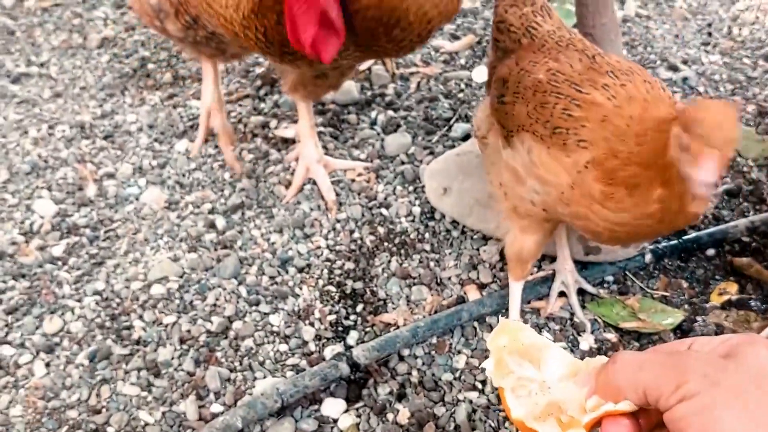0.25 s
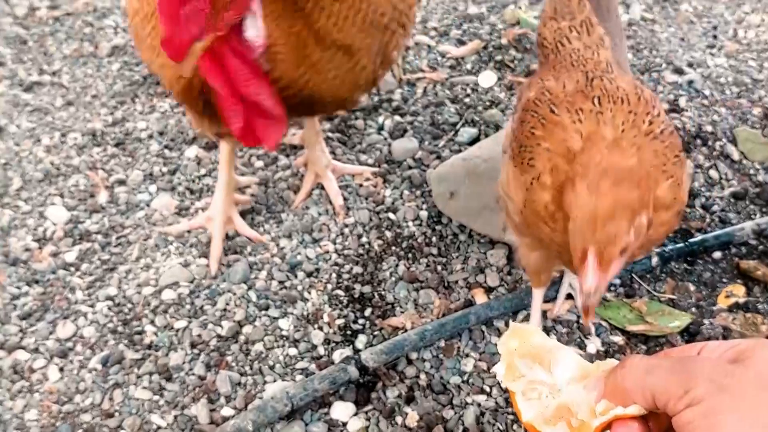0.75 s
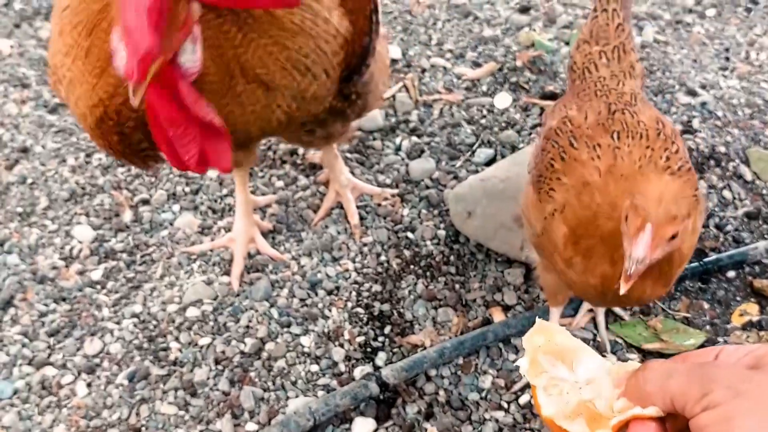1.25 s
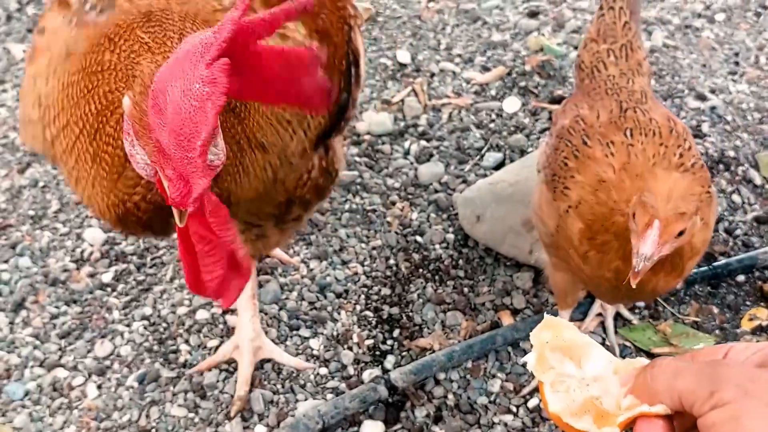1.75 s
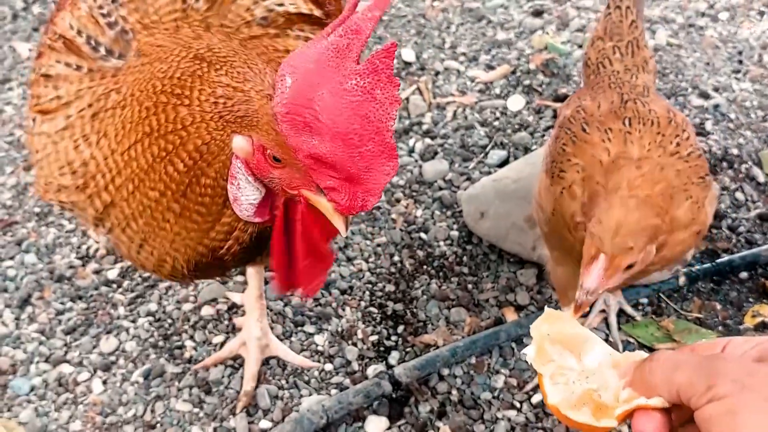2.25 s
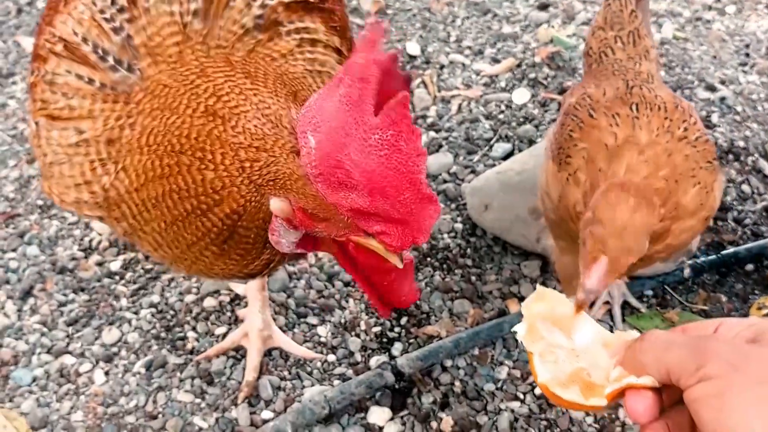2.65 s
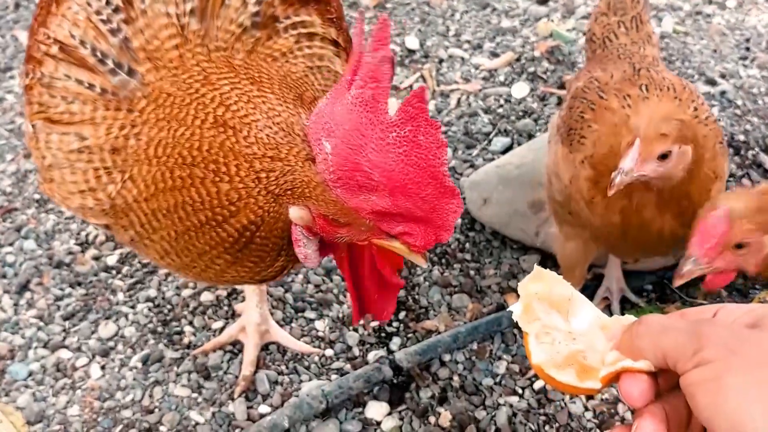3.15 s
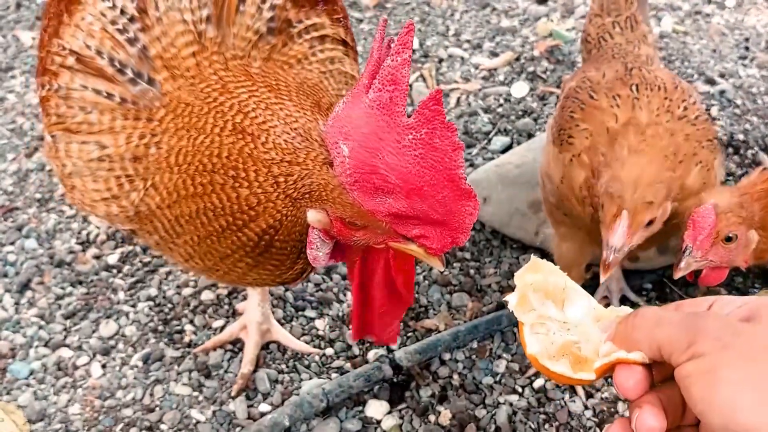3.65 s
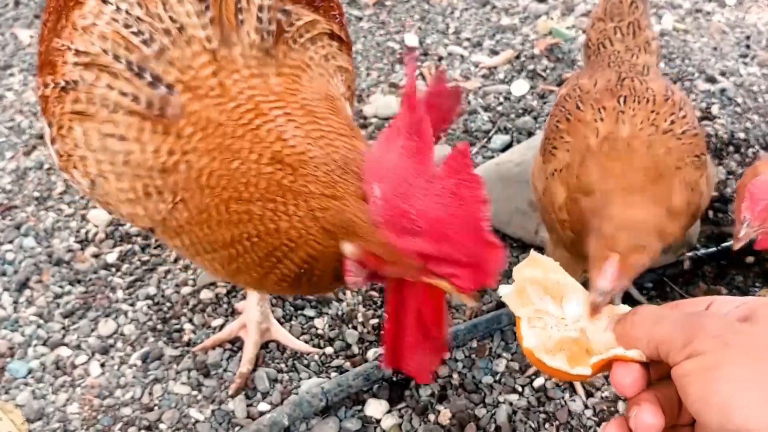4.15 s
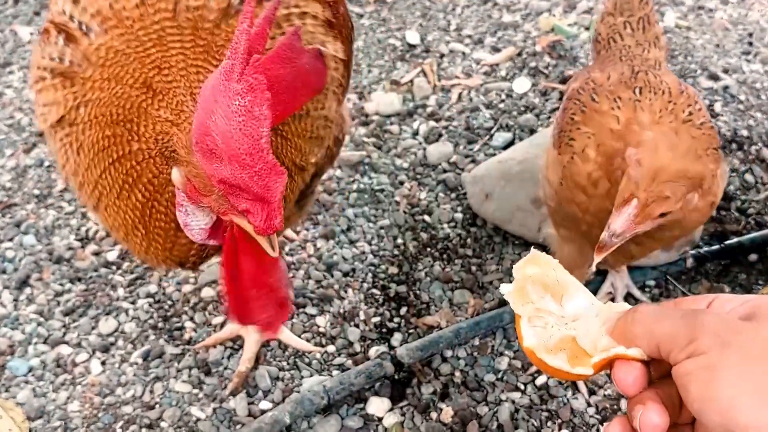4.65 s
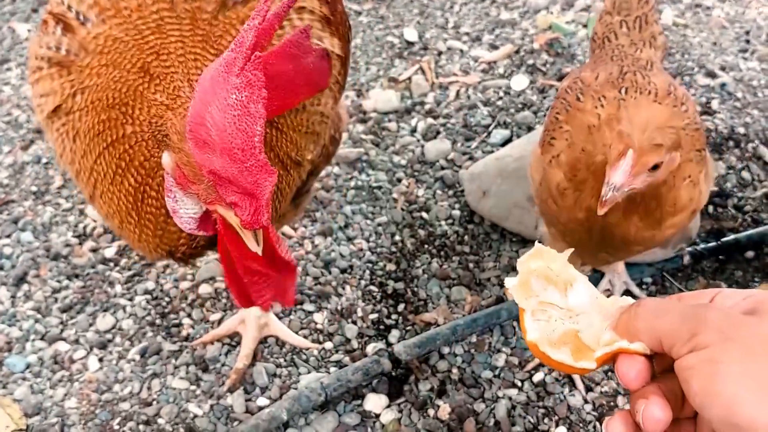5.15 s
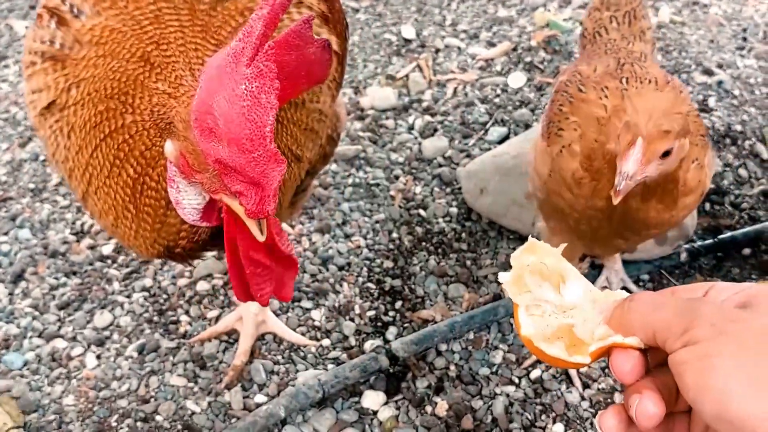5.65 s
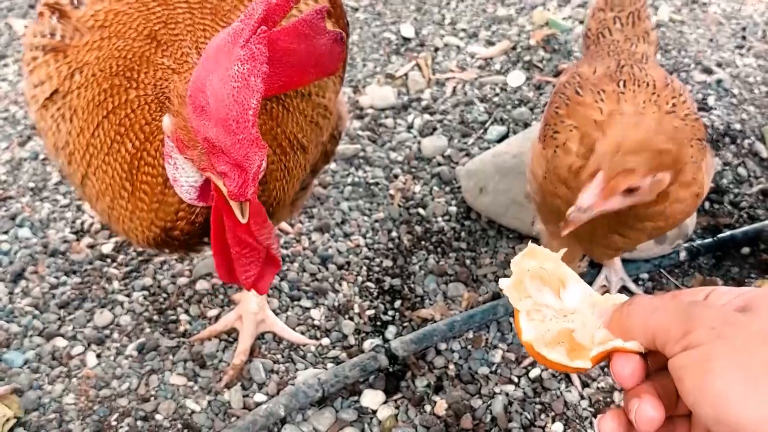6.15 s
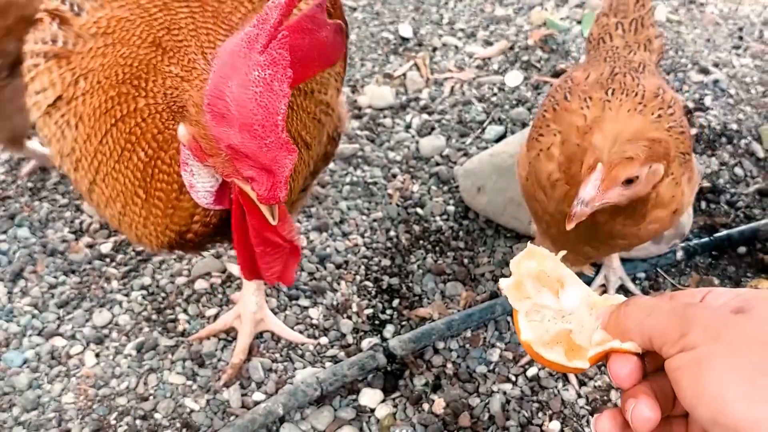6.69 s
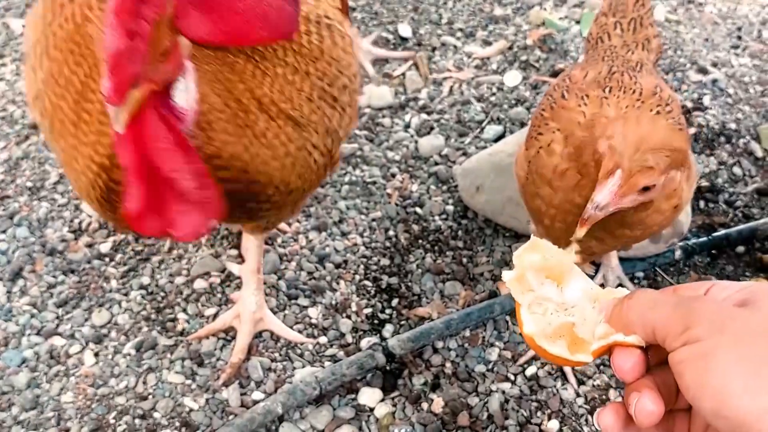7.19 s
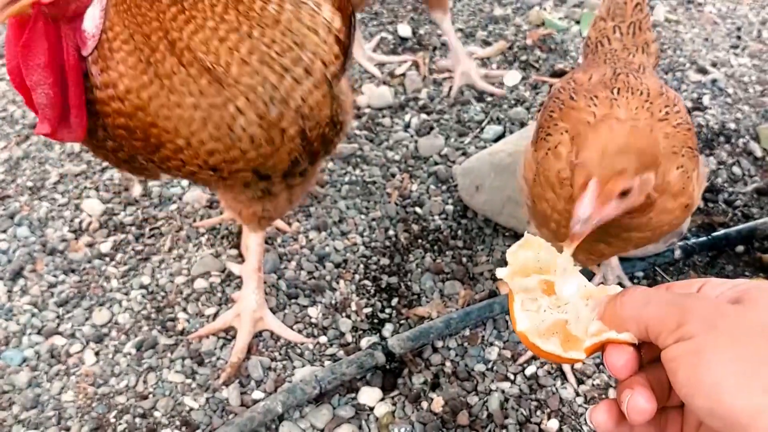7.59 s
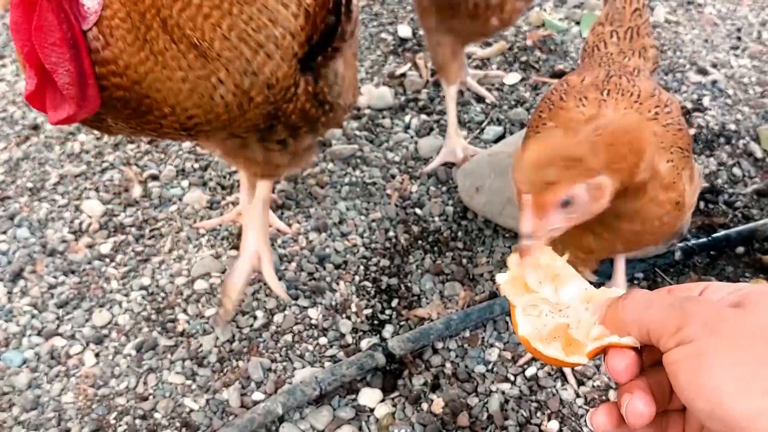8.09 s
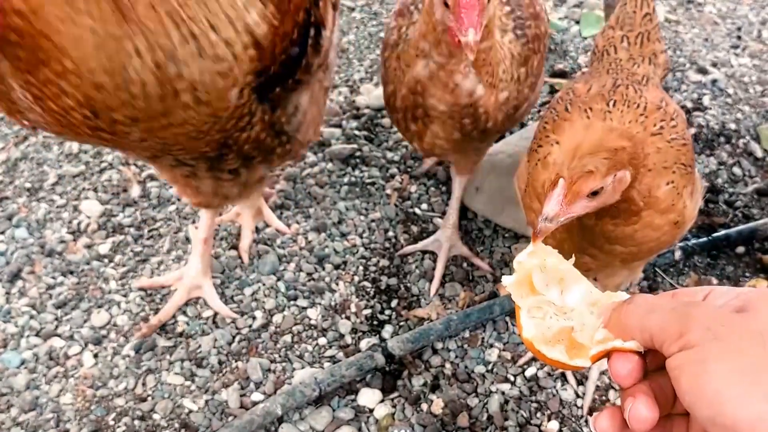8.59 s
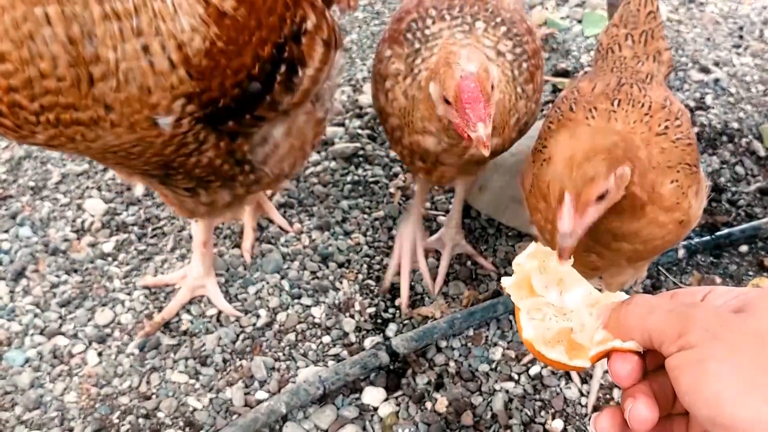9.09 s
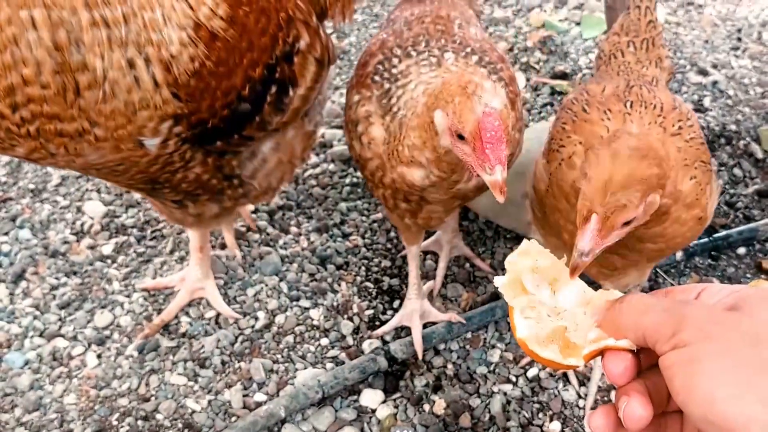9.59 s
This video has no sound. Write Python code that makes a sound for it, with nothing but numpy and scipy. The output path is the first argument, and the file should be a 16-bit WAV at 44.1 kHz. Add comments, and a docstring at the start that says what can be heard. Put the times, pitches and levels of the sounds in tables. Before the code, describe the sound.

A thin peep, a beak snap and a buzzing cheep open the scene, then short clucks quicken. Young chickens close to a stereo microphone give falling whistles that turn hoarse and break into yelps, while beaks snap and tear at fruit. Feathers and feet rustle softly on gravel, small birds chirp far away, and a low machine hum wavers beneath thin outdoor air.

```python
"""First a thin many-voiced peep, the snap of a beak and a buzzing cheep, over a low hum and thin air.
Young chickens then cluck and whistle around a hand that holds out fruit in a gravel yard. Each call is
built from gliding tones for the two sides of the syrinx, and turns hoarse or cracks into a yelp.
Beaks, feet and feathers are bursts of tiny snaps; small birds further off are blurred tones.
A distant machine drones on one wavering note, and scattered echoes surround all the birds and taps."""
import sys
import numpy as np
from scipy import signal
from scipy.fft import rfft, irfft
from scipy.io import wavfile

SR = 44100
rng = np.random.default_rng(int(sys.argv[2]) if len(sys.argv) > 2 else 0)


def master_out(mix):
    """Clip the mix to full scale and print it as 16-bit PCM to the path in sys.argv[1]."""
    frames = np.transpose(np.atleast_2d(mix))
    ceiling = np.clip(frames, -1, 1)
    pcm = np.round(ceiling * 32767).astype(np.int16)
    wavfile.write(sys.argv[1], SR, pcm)


N = 433503  # samples in the scene


def amp(db):
    """Decibels to gain."""
    return 10 ** (np.asarray(db) / 20)


def unit(x):
    """Scales to an rms of 1."""
    return x / np.sqrt(np.mean(abs(x) ** 2) + 1e-20)


def columns(rows, at):
    """Reads every further column of a table by straight lines along its first."""
    first, *rest = np.transpose(rows)
    return [np.interp(at, first, column) for column in rest]


def colour(x, points, tilt_db=0):
    """Filters by a few (Hz, dB) points, plus a tilt in dB per octave about 8 kHz, level below 1 kHz."""
    hz = np.fft.rfftfreq(x.shape[-1], 1 / SR) + 1  # keeps the logarithm finite
    point_hz, point_db = np.transpose(points)
    db = np.interp(np.log(hz), np.log(point_hz), point_db)
    db = db + tilt_db * np.log2(np.maximum(hz, 1000) / 8000)
    return irfft(rfft(x) * amp(db), x.shape[-1])


def wander(n, width_hz):
    """Complex noise of rms 1 that changes at about the width's pace or slower."""
    hz = np.fft.fftfreq(n, 1 / SR)
    spectrum = np.exp(2j * np.pi * rng.random(n)) / (1 + (hz / width_hz) ** 2)
    return unit(np.fft.ifft(spectrum))


def turn(hz):
    """A complex tone that follows a pitch curve."""
    return np.exp(2j * np.pi * np.cumsum(hz) / SR)


def grains(n, per_s, spread_db):
    """Tiny snaps of uneven size, each reaching the two microphones differently."""
    happens = rng.random(n) < per_s / SR
    size = happens * amp(spread_db * np.minimum(rng.exponential(1, n), 3))
    return unit(size * rng.uniform(-1.12, 1, (2, n)))


# Where the calling bird stands. Each row: time in seconds, lead of the left ear in ms.
BIRD_PLACE = [(1.55, -0.18), (2.5, 0.49), (4.9, 0.39), (6.55, 0.23), (7.2, 0.36), (7.9, 0.015),
              (8.85, 0.095), (9.08, 0.41)]


def add(mix, s, sound, lead_ms=0, side_db=0):
    """Places a sound between the two microphones by arrival time and level; positive is left."""
    for ear, sign, wave in zip(mix, (1, -1), np.broadcast_to(sound, (2, sound.shape[-1]))):
        start = max(0, round((s - sign * lead_ms / 2000) * SR))
        part = ear[start:][:len(wave)]
        part += amp(sign * side_db / 2) * wave[:len(part)]


# Moments when the voice cracks.
# Each row: middle in seconds, length in seconds, added hoarseness from 0 to 1.
CRACKS = [(2.51, 0.033, 0.24), (2.784, .035, 0.2), (5.753, 0.045, 0.52), (5.848, 0.043, 0.77),
          (6.87, 0.095, 0.57), (8.281, 0.065, 0.42), (8.388, 0.055, 0.55), (8.71, 0.037, 0.97),
          (8.779, 0.067, 0.79), (8.855, 0.015, 0.7), (5.894, .03, 0.17)]


def cracked(times):
    """How far the voice is cracked at each moment, as a sum of flat-topped bumps."""
    return sum(more * np.exp(-(2 * (times - s) / span) ** 4) for s, span, more in CRACKS)


# The falling whistles. Each row: start in seconds, length in seconds, first pitch in Hz, last pitch in Hz,
# arch of the glide in Hz, level in dB, swell from start to end in dB, belly in the middle in dB,
# overtones in dB, left-right balance in dB.
WHISTLES = [(2.443, 0.17, 2910, 2240, -38, -36, -1.5, 4, -24.5, 5),
            (2.704, 0.17, 2700, 2347, 401, -29, -7, -1.5, -34, 5.5),
            (3.046, 0.15, 2785, 2200, 263, -34, 4, 2.5, -29.5, -5.5),
            (4.027, 0.17, 2933, 2232, -160, -34, 4.5, 5.5, -32.5, 5),
            (4.741, .16, 2726, 2303, 101, -29, 5, 1.5, -27.5, 5.5),
            (5.402, 0.14, 2945, 2317, 34, -26.5, -2.5, -0.5, -28, 5),
            (5.691, 0.19, 2692, 2320, 197, -32, -8.5, 5.5, -30, 3.5),
            (6.504, 0.16, 2720, 2160, -34.5, -37, -3, 2, -34, 7),
            (6.805, 0.15, 2740, 2260, -47, -45, 9, 7.5, -50, 0),
            (7.13, 0.125, 3510, 2740, 220, -45.5, -6, 3.5, -27, 3),
            (7.887, 0.2, 2816, 2297, -48.5, -33.5, 10.5, 2, -31, -3.5),
            (8.235, 0.21, 2578, 2303, 210, -27, 10.5, -1.5, -22, 1.5),
            (8.665, 0.16, 2634, 2332, 214, -22, 10, -9, -18.5, -0.5)]
# Side bands of a hoarse voice. Each row: distance from the note in Hz, level in dB.
RASP_BANDS = [(-1200, -2.5), (-330, 0.5), (228.5, -5.5), (850, -7.5)]
# Colour of the throat. Each row: frequency in Hz, gain in dB.
THROAT = [(500, -9.5), (980, -3.5), (3400, -1), (5400, 8.5)]
ATTACK_S, RELEASE_S = 0.019, 0.002  # the release is for whistles that break into a yelp
FADE_S, FLICK_HZ = 0.024, 254  # the others fade out with an upward flick
ARCH_DELAY = 1.3  # above 1, the arch of the glide peaks late
CRACK_DB = 5.5  # a full crack is this much louder than the note around it
SECOND_VOICE_HZ = 725  # the other side of the syrinx sings this far above
SECOND_VOICE_DB = -47  # its level in a whistle of -34 dB
# The second voice opens each whistle alone, louder at first, sliding up to its note.
LEAD_S, LEAD_DB, LEAD_RISE_S = 0.02, 6, .012


def whistle(start, length, first_hz, last_hz, arch_hz, level_db, swell_db, belly_db, overtone_db,
            shimmer=0.087, second_share=0.44):
    """Two voices of the syrinx glide down in an arch; when hoarse, they scatter into side bands."""
    t = np.arange(0, length, 1 / SR)
    n, u = len(t), t / length
    breaks = any(abs(s - start - length) < .04 for s, *_ in YELPS)  # a yelp takes over at the end
    fade = np.minimum((length - t) / (RELEASE_S if breaks else FADE_S), 1)

    glide = first_hz + (last_hz - first_hz) * u + arch_hz * np.sin(np.pi * u ** ARCH_DELAY)
    flick = (not breaks) * FLICK_HZ * (1 - fade)
    hz = glide * (1 + .015 * wander(n, 30).real) + flick
    crack = cracked(start + t)
    db = level_db + swell_db * (u - .5) + belly_db * np.sin(np.pi * u) + CRACK_DB * crack
    hoarse = np.clip((.09 + crack) * (1 + .45 * wander(n, 45).real), 0, .9)
    main = turn(hz * (1 + (.005 + .03 * hoarse) * wander(n, 99).real))

    # the second voice leads in, then comes and goes, and grows less with effort
    apart_hz = SECOND_VOICE_HZ * (1 - np.exp(-t / LEAD_RISE_S))
    lead_db = LEAD_DB * np.exp(-(t / (2 * LEAD_S)) ** 2)
    second_db = SECOND_VOICE_DB + second_share * (level_db + 34.0) + lead_db - db  # relative to the main
    second_tone = turn(hz + apart_hz + 45 * wander(n, 90).real)
    second = amp(np.minimum(second_db, -3)) * second_tone * (.45 + .75 * wander(n, 16))

    rasp = unit(sum(amp(d) * turn(hz + off) * wander(n, 110) for off, d in RASP_BANDS))
    attack = np.clip((t - LEAD_S) / ATTACK_S + .5, 0, 1)
    voice = attack * (np.sqrt(1 - hoarse ** 2) * main + hoarse * rasp) + second
    # the voices share one airflow, so flickering sum tones appear above them
    both = voice - attack * hoarse * rasp / 2 + second
    sums = both ** 2 + .18 * both * (attack * main) ** 2
    voice = voice + amp(overtone_db) * (.3 + .75 * wander(n, 18)) * sums

    swell = amp(db) * (1 + shimmer * wander(n, 57).real) * np.minimum(t / LEAD_S, 1) * fade
    return colour(np.sqrt(2) * voice.real * swell, THROAT)


# Yelps, mostly where a whistle breaks down. Each row: start in seconds, length in seconds, level in dB.
YELPS = [(2.872, 0.02, -21), (4.901, 0.033, -17), (5.537, 0.02, -11), (5.866, 0.021, -13),
         (6.917, 0.015, -26), (7.213, 0.025, -49), (8.093, 0.031, -20), (8.44, 0.031, -15),
         (8.82, 0.019, -10)]
YELP_FIRST_HZ, YELP_LAST_HZ, YELP_OVERTONE_DB = 1858, 1410, -28
# The clucks. Each row: start in seconds, length in seconds, middle pitch in Hz, level in dB, overtones in dB.
CLUCKS = [(0.555, 0.026, 1087, -27, -9.5), (1.008, 0.034, 1032, -26.5, -23),
          (1.177, 0.023, 1052, -34.5, -30), (1.328, 0.044, 1124, -18.5, -28),
          (1.524, 0.047, 1102, -17, -18), (2.89, 0.019, 1020, -13, -3.5), (4.931, 0.018, 1030, -21.5, -7),
          (5.557, 0.016, 1053, -16, -4.5), (5.885, 0.03, 1082, -12, -9.5),
          (6.958, 0.022, 1146, -33.5, -8.5), (7.242, 0.029, 1175, -34.5, -5),
          (8.836, 0.027, 1025, -15.5, -2.5)]
CLUCK_FALL_OCT_PER_S = 8.2  # every cluck sags at this rate


def cluck(start, length, first_hz, last_hz, db, overtone_db, rolloff_db=-10, grit_db=-16):
    """A short falling note with overtones; bright ones start abruptly, and a crack doubles the period."""
    t = np.arange(0, length, 1 / SR)
    n, u = len(t), t / length
    harsh = np.clip(1 + overtone_db / 24, 0, 1)
    hz = first_hz + (last_hz - first_hz) * u ** .8
    half = turn(hz * (1 + .012 * wander(n, 150).real) / 2)  # an octave below the note
    tone = half ** 2
    step_db = rolloff_db * (1.91 - harsh)  # from one overtone to the next
    overtones = sum(amp(overtone_db + step_db * k) * 1j ** k * tone ** (k + 2) for k in range(6))
    undertone = cracked(start + t) * (half / 4 + half ** 3)
    grit = amp(grit_db) * harsh * (tone + tone ** 2 / 2 + tone ** 4 / 10) * wander(n, 400)
    shape = np.sin(np.pi * u ** (1.1 - .8 * harsh)).clip(0) ** .8
    shape = shape * (1 + .08 * wander(n, 84).real)
    voice = shape * (tone + overtones + undertone + grit).real
    return np.sqrt(2) * amp(db) * colour(voice, THROAT)


# Peeps of the youngest. Each row: start in seconds, length in seconds, first pitch of the steep voice in Hz,
# level in dB, bend of the glide (above 1 falls late).
PEEPS = [(0.091, 0.19, 2540, -40, 1.25), (1.333, 0.2, 2520, -35.5, 0.56), (1.68, .18, 2915, -33, 1.6),
         (9.089, 0.14, 2820, -35, 2.06)]
# The other voices of a peep. Each row: first pitch in Hz, last pitch in Hz, level in dB.
PEEP_VOICES = [(2130, 1780, -2.5), (3305, 2650, -1.5), (3643, 2880, -3)]


def peep(length, steep_hz, db, bend, last_hz=2030, overtone_db=-8, hand_db=-11):
    """Four fuzzy voices glide down, the upper ones fading first; their sum tones shine at the start."""
    n = int(length * SR)
    u = np.linspace(0, 1, n)
    voices = 0
    for first, last, voice_db in [*PEEP_VOICES, (steep_hz, last_hz, 0)]:
        tone = turn(first + (last - first) * u ** bend + 26 * wander(n, 90).real)
        fuzz = 1 + 0.68 * wander(n, 16) + 0.22 * wander(n, 380)
        fading = amp(hand_db * (u - .5) * (first > steep_hz))
        voices = voices + amp(voice_db) * tone * fuzz * fading
    voices = unit(voices)
    upper = colour(voices.real ** 2, [(3000, -54.5), (5200, -23), (6900, -2.5), (8000, 14.5)])
    shine = amp(overtone_db) * unit(upper) * 2 * (1 - u) ** 2
    shape = np.sin(np.pi * u ** .85).clip(0) ** 1.2
    return amp(db) * shape * (unit(voices.real) + shine)


def duet(hz, split_hz, lower_db, fuzz):
    """Two voices either side of a pitch, beating unevenly against each other, with a little fuzz."""
    apart = split_hz / 2 * (1 + .3 * wander(len(hz), 40).real)
    haze = fuzz * turn(hz) * wander(len(hz), 190)
    return unit(turn(hz + apart) + amp(lower_db) * turn(hz - apart) + haze)


# Wavering calls, often just before a cluck.
# Each row: start in seconds, length in seconds, middle pitch in Hz, level in dB.
CLASHES = [(0.522, 0.037, 1640, -47.5), (0.708, 0.074, 1900, -45.5), (0.946, 0.066, 1650, -42.5),
           (6.264, 0.04, 1810, -40.5), (1.132, 0.076, 1256, -33.5), (1.303, 0.048, 1304, -36.5),
           (1.496, 0.045, 1198, -30)]
CLASH_FALL_OCT_PER_S = 2.36


def clash(length, hz, db, split_hz=150, lower_db=-4):
    """The two voices sag side by side without locking; the softer, the fuzzier."""
    t = np.arange(0, length, 1 / SR)
    sagging_hz = hz * 2 ** (CLASH_FALL_OCT_PER_S * (length / 2 - t))
    voice = duet(sagging_hz, split_hz, lower_db, amp(-42 - db))
    return np.sqrt(2) * amp(db) * voice.real * np.sin(np.pi * t / length)


# One buzzing cheep. Each row: time in seconds, pitch in Hz, level in dB.
TRILL = [(.28, 2294, -62), (.32, 2610, -35), (.345, 2610, -33), (.372, 2530, -45.5), (.395, 2520, -36.5),
         (.428, 2370, -39), (.455, 2000, -55)]


def trill(split_hz=190, lower_db=-4, octave_db=-17):
    """An arched cheep that buzzes with the beat of its two voices."""
    hz, db = columns(TRILL, np.arange(TRILL[0][0], TRILL[-1][0], 1 / SR))
    voice = duet(hz, split_hz, lower_db, .6)
    return np.sqrt(2) * amp(db) * (voice + amp(octave_db) * voice ** 2).real


# A low mutter. Each row: time in seconds, pitch in Hz, level in dB.
MURMUR = [(8.085, 515, -48), (8.11, 573, -43), (8.13, 567, -40.5), (8.158, 464, -45)]


def murmur(rough=1.0, overtone_db=-11):
    """A low, shaky note with three gravelly overtones, the higher the rougher."""
    t = np.arange(MURMUR[0][0], MURMUR[-1][0], 1 / SR)
    hz, db = columns(MURMUR, t)
    voice = 0
    for k in range(1, 5):
        shake = 1 + rough * k * wander(len(t), 170) / 2
        voice = voice + amp(overtone_db * (k > 1)) * turn(k * hz) * shake
    return amp(db) * voice.real


# Beak and claw taps. Each row: time in seconds, peak in dB, left-right balance in dB, tilt in dB per octave.
TAPS = [(.177, -18.5, -10, 9), (0.691, -26, -19, 8.5), (0.922, -21, -4, 9), (.967, -5.5, -11.5, 9),
        (1.344, -16, -13, 4.5), (1.618, -18.5, -23, 17), (1.955, -7.5, -10.5, 12.5), (2.311, -18, -15, 14),
        (2.706, -24, -12.5, -14), (2.726, -19, -22, 17), (2.805, -26.5, -3, -6), (3.495, -26.5, -7.5, -18),
        (3.871, -24, 7, 5), (3.896, -23.5, 2, 0), (4.542, -30.5, -13, -2.5), (4.589, -28, -12, 0.5),
        (4.655, -24.5, -14, -0.5), (4.92, -17, 8, 3), (5.615, -20, 5, 2), (5.752, -15.5, 5, 3),
        (6.63, -19.5, 8, 8), (6.931, -30.5, -4, -15), (9.4303, -33, -7, -18)]
# Colour of a tap. Each row: frequency in Hz, gain in dB.
TAP_COLOUR = [(1470, -61.5), (2500, -31), (4510, -21), (5310, -6), (9220, -21.5), (11400, -12.5),
              (16000, -14)]


def tap(db, tilt_db, crunch_t60=0.13, crunch_db=-11):
    """A beak snaps shut, then fibres tear: a dense burst of grains and a slower, sparser one."""
    t = np.arange(SR // 5) / SR
    snap = grains(len(t), 12000, 2) * amp(-60 * t / .014)
    crunch = grains(len(t), 4000, 2) * amp(crunch_db - 60 * t / crunch_t60)
    padded = np.pad(snap + crunch, ((0, 0), (64, 0)))  # room for the filter to ring before the snap
    sound = colour(padded, TAP_COLOUR, tilt_db)
    return amp(db) * sound / abs(sound).max()


def stroke(length, db, spectrum, patchy_db=5):
    """A clump of crackling grains that swells quickly and dies away."""
    n = int(length * SR)
    crackle = grains(n, 3000, 4) * amp(patchy_db * wander(n, 27).real)
    return amp(db) * unit(colour(crackle, spectrum)) * np.sin(np.pi * np.linspace(0, 1, n) ** .5)


# Strokes of feathers, claws and peel. Each row: start in seconds, length in seconds, level in dB.
RUSTLE = [(0.514, 0.088, -52), (1.34, 0.26, -50), (1.497, 0.079, -43.5), (1.574, 0.098, -44.5),
          (1.929, 0.13, -44), (2.294, 0.16, -46.5), (2.436, 0.2, -48.5), (2.616, 0.44, -44.5),
          (4.403, 0.059, -41.5), (4.593, 0.39, -46.5), (4.816, 0.26, -38.5), (5.373, 0.22, -48.5),
          (5.724, 0.31, -42), (6.559, 0.21, -49), (8.015, 0.28, -52), (8.271, 0.65, -51.5),
          (8.71, 0.27, -50), (9.079, 0.29, -49.5)]
# Colour of the rustle. Each row: frequency in Hz, gain in dB.
RUSTLE_COLOUR = [(710, -50.5), (1200, -22.5), (1730, -14.5), (2000, -21.5), (6800, -12.5), (9010, -23.5),
                 (12500, -13.5), (16000, -20)]
# Dull shuffling of feet. Each row: start in seconds, length in seconds, level in dB.
SCUFFS = [(0.943, 0.46, -54.5), (4.151, 0.84, -55.5), (7.829, 0.011, -48)]


def rustle(side_db=-3, fidget_db=-60, grit_db=-64):
    """Strokes and scuffs of grains over constant fidgeting and stray ticks of grit."""
    fidget = grains(N, 3600, 1.2) * amp(8.6 * wander(N, 8.3).real)
    ticks = grains(N, 60, 2.5) * amp(5 * wander(N, 5).real)
    out = amp(fidget_db) * unit(colour(fidget, RUSTLE_COLOUR))
    out = out + amp(grit_db) * unit(colour(ticks, RUSTLE_COLOUR))
    for s, length, db in RUSTLE:
        add(out, s, stroke(length, db, RUSTLE_COLOUR), side_db=side_db)
    for s, length, db in SCUFFS:
        add(out, s, stroke(length, db, [(300, -19), (800, -15), (5000, -30.0)]))
    return out


# Slurred calls of far birds. Each entry: start in seconds.
SLURS = [1.081, 2.254, 3.188, 3.871, 4.971, 6.619, 7.819, 8.531, 9.311]
# Chips of far birds. Each row: start in seconds, level in dB.
CHIPS = [(0.589, -45.5), (1.572, -50), (1.615, -46.5), (6.168, -50), (6.214, -50), (7.688, -47),
         (9.512, -45)]


def far_call(db, length, first_hz, last_hz, blur_hz):
    """A falling whistle, blurred by distance into a narrow band of noise."""
    n = int(length * SR)
    tone = turn(np.linspace(first_hz, last_hz, n)) * wander(n, blur_hz)
    return amp(db) * unit(tone.real) * np.sin(np.linspace(0, np.pi, n))


# Send of the near sounds into the yard; a bird turned away is heard more through it.
# Each row: time in seconds, echo in dB.
ECHO = [(6.7, -21), (6.9, -9), (7.3, -8), (7.6, -23)]


def yard(x, t60=0.3, dull_db=-3):
    """Weak scattered echoes from fences and ground, as sparse random taps that die away."""
    t = np.arange(SR // 2) / SR
    bounces = rng.random((2, len(t))) < 2500 / SR  # per second
    taps = rng.standard_normal((2, len(t))) * bounces * (t > .006) * amp(-60 * t / t60)
    tail = colour(taps, [(1500, 0.0089), (8000, dull_db)])
    return signal.fftconvolve(x, tail / np.linalg.norm(tail[0]), axes=1)[:, :N]


# Swelling of the distant machine. Each row: time in seconds, level in dB.
HUM_LEVEL = [(0, -47), (.65, -49), (.82, -35.5), (.92, -59), (1.2, -37.5), (1.33, -47), (1.5, -37.5),
             (1.87, -40), (2, -52), (2.14, -29.5), (2.24, -49), (3.25, -45.5), (3.5, -52.5), (3.85, -56),
             (4, -42), (5.3, -52), (6.3, -47), (7.6, -57.5), (8.7, -45), (9.25, -55.5)]


def hum(hz=131, width_hz=8, unsteady=0.96):
    """A distant machine drones on one wavering note, swelling and sinking."""
    db, = columns(HUM_LEVEL, np.arange(N) / SR)
    tone = turn(hz + 3 * wander(N, 2.5).real) * (1 + unsteady * wander(N, width_hz))
    return amp(db) * unit(tone.real)


# Colour of the open air. Each row: frequency in Hz, gain in dB.
AIR_COLOUR = [(20, -30), (105, -7.5), (206, -19), (326, -20), (560, -32.5), (1260, -38), (1700, -48.5),
              (7310, -35.5), (9570, -48.5), (16000, -34)]
# Width of the air. Each row: frequency in Hz, likeness of the two ears, left-right balance in dB.
AIR_STEREO = [(30, 0.94, -19), (127, 0.81, -8.5), (920, 0.2, -2)]
AIR_DB = -48


def air():
    """Outdoor rumble and thin hiss: coloured noise, most alike in the two ears at the bottom."""
    same, side_db = columns(AIR_STEREO, np.fft.rfftfreq(N, 1 / SR))
    a, b = rfft(rng.standard_normal((2, N)))
    same = np.clip(same, -1, 1)
    left = a * amp(side_db / 2)
    right = (same * a + np.sqrt(1 - same ** 2) * b) * amp(-side_db / 2)
    return amp(AIR_DB) * unit(colour(irfft(np.array([left, right]), N), AIR_COLOUR))


def scene():
    """Near birds, far birds and their echoes over the rustle, air and hum of the yard."""
    near, far = np.zeros((2, 2, N))
    for s, *row, side_db in WHISTLES:
        add(near, s, whistle(s, *row), *columns(BIRD_PLACE, s), side_db=side_db)
    for s, length, db in YELPS:
        yelp = cluck(s, length, YELP_FIRST_HZ, YELP_LAST_HZ, db, YELP_OVERTONE_DB)
        add(near, s, yelp, *columns(BIRD_PLACE, s))
    for s, length, hz, db, overtone_db in CLUCKS:
        sag = 2 ** (CLUCK_FALL_OCT_PER_S * length / 2)
        add(near, s, cluck(s, length, hz * sag, hz / sag, db, overtone_db), *columns(BIRD_PLACE, s))
    for s, *row in PEEPS:
        add(near, s, peep(*row), *columns(BIRD_PLACE, s), side_db=9.0)
    for s, *row in CLASHES:
        add(near, s, clash(*row), *columns(BIRD_PLACE, s))
    add(near, TRILL[0][0], trill(), lead_ms=-.09, side_db=-10.0)
    add(near, MURMUR[0][0], murmur())
    for s, db, side_db, tilt_db in TAPS:
        add(near, s - .001, tap(db, tilt_db), side_db=side_db)
    for s in SLURS:
        first_hz = 4800 * rng.uniform(0.94, 1.05)
        add(far, s, far_call(-55.0, length=0.19, first_hz=first_hz, last_hz=3200, blur_hz=537))
    for s, db in CHIPS:
        add(far, s, far_call(db, length=0.018, first_hz=3944, last_hz=3754, blur_hz=113.5))

    echo_db, = columns(ECHO, np.arange(N) / SR)
    echoes = yard(amp(echo_db) * near + far / 2)
    mix = near + echoes + far + rustle() + air()
    add(mix, 0, hum(), side_db=-7.5)
    return mix


def record(dry):
    """A steep low-pass at the top of the band, 16.3 kHz."""
    lowpass = signal.firwin(301, 16300, window=("kaiser", 9), fs=SR)
    return signal.oaconvolve(dry, lowpass[None], "same")


dry = scene()
out = record(dry)
master_out(out)
```